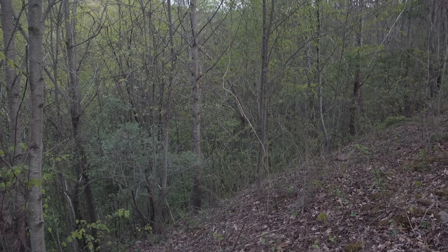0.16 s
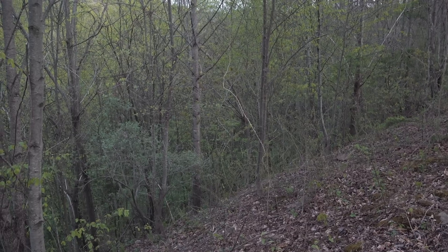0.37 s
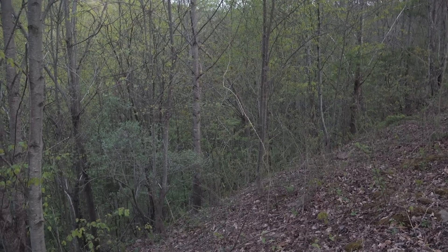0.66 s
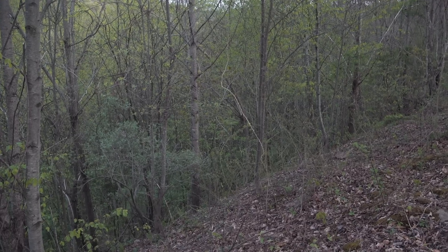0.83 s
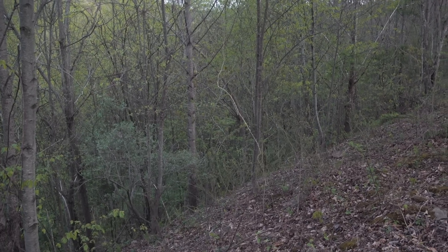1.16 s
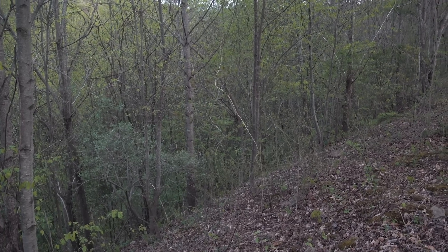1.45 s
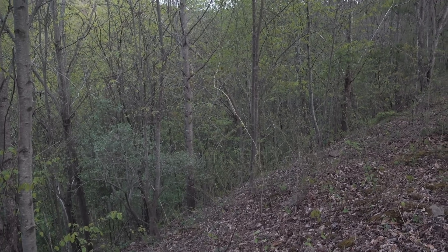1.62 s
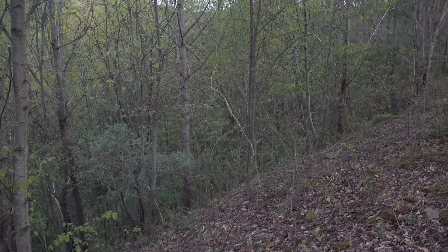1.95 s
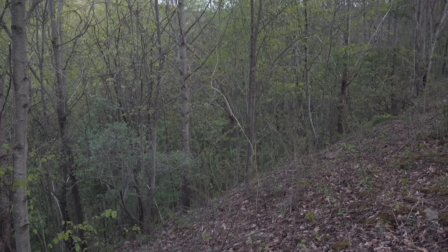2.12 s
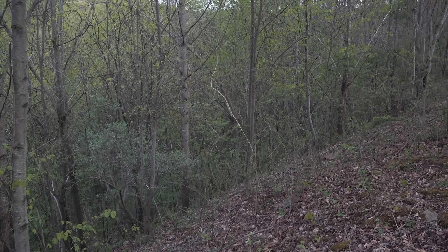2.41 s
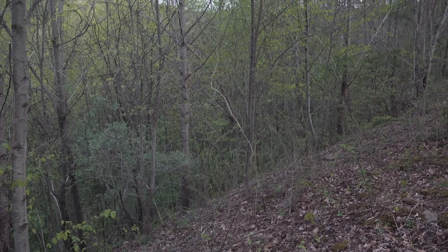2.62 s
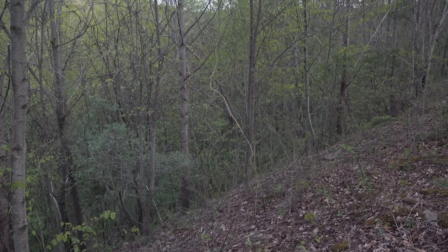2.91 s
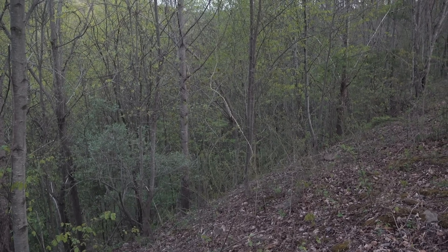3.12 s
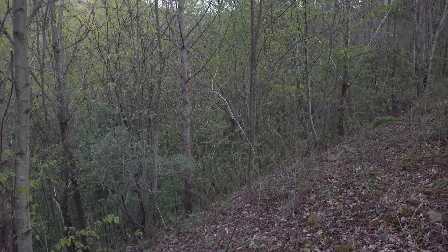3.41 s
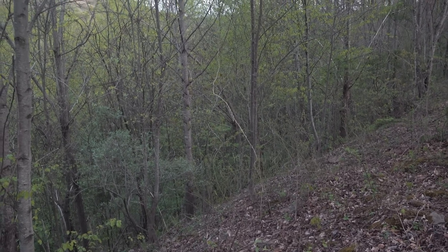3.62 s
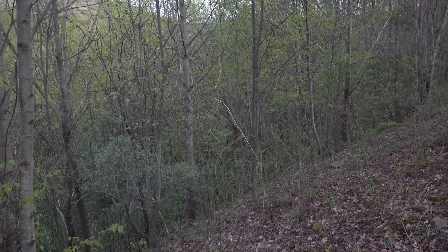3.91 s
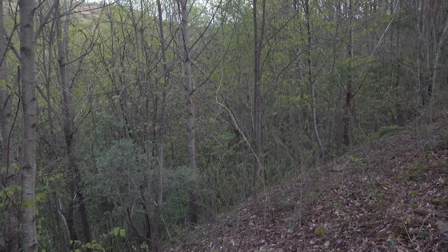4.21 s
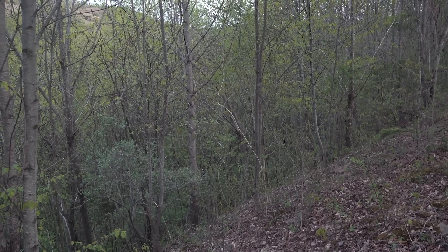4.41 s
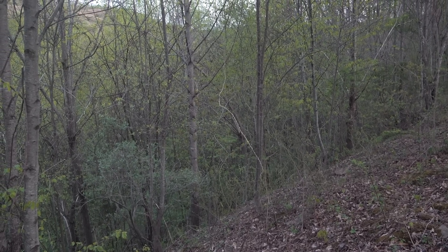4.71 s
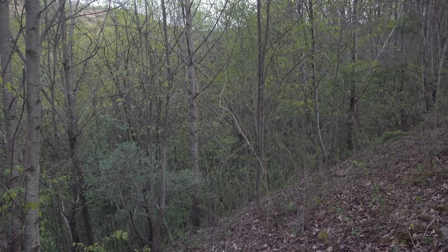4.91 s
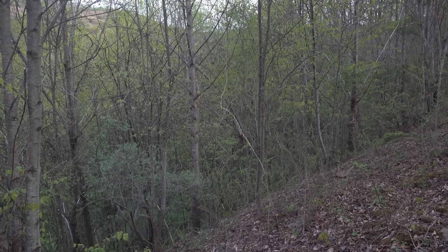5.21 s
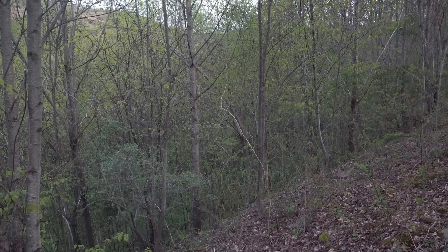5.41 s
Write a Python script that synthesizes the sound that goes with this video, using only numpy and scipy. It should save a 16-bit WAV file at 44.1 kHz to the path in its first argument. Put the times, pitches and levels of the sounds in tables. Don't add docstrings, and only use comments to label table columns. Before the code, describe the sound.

Three quick hoots and a longer falling hoot from a nearby owl, answered by a fainter rattling gobble, with faint birds and low wind bumps.

```python
import sys
import numpy as np
from scipy import signal
from scipy.fft import rfft, irfft
from scipy.io import wavfile
from scipy.ndimage import uniform_filter1d

SR = 44100
rng = np.random.default_rng(int(sys.argv[2]) if len(sys.argv) > 2 else 0)


def output_pcm(signal):
    pcm = np.clip(np.atleast_2d(signal).T, -1, 1) * 32767
    wavfile.write(sys.argv[1], SR, np.round(pcm).astype(np.int16))


def nominal_scale(level):
    x = np.asarray(level, float) / 20
    return 10 ** x


N = 245195
T = np.arange(N) / SR


def evened(x):
    return x / np.sqrt(np.mean(x ** 2) + 1e-20)


def peaked(x):
    return x / abs(x).max()


def read(points, hz):
    f, value = np.transpose(points)
    return np.interp(np.log(hz + 1), np.log(f + 1), value)


def add(mix, start_s, sound):
    part = mix[round(start_s * SR):][:len(sound)]
    part += sound[:len(part)]


def resonate(x, hz, width_hz):
    turn = np.exp(2j * np.pi * np.cumsum(hz * np.ones(len(x))) / SR)
    r = np.exp(-np.pi * width_hz / SR)
    return 2 * (turn * signal.lfilter([1 - r], [1, -r], x / turn)).real


def drift(count, span):
    return evened(uniform_filter1d(uniform_filter1d(rng.standard_normal(count), span), span))


def background(gain):
    # hz, level_db (per Hz)
    air_spectrum = [(15, -30.5), (25, -19), (179, 0), (216, -8.5), (360, -4.5), (510, -6.5), (650, -5),
                    (705, -8.5), (923, -11), (1240, -14.5), (1810, -18.5), (3450, -24), (4060, -26),
                    (15600, -35.5)]
    # centre_s, half_length_s, level_db
    gust_times = [(0.603, 0.022, -32.5), (2.03, 0.042, -36.5), (2.148, .05, -33), (2.539, 0.051, -41),
                  (3.045, 0.14, -45), (3.357, 0.034, -38), (3.47, 0.036, -38), (3.603, 0.032, -36),
                  (3.842, 0.057, -37), (4.53, 0.011, -36.5), (4.953, .05, -32.5), (5.47, .04, -59)]
    frames, hz = N // 256 + 5, np.fft.rfftfreq(1024, 1 / SR)
    a, b, patches = rng.standard_normal((frames, 513, 3)).T
    patches = evened(uniform_filter1d(uniform_filter1d(patches, 10, 0), 12, 1))
    depth_db = 2.2 / (1 + hz / 2500)[:, None]
    level_db = read(air_spectrum, hz)[:, None] + depth_db * patches
    hush = signal.istft((a + 1j * b) * nominal_scale(level_db), nperseg=1024, noverlap=768)[1]
    whine = nominal_scale(-83.5) * np.sin(2 * np.pi * 14320 * T)
    wind = evened(resonate(resonate(rng.standard_normal(N), 98.7, 30), 88, 40))
    gusts = nominal_scale(-61)
    for centre_s, half_s, db in gust_times:
        gusts = gusts + nominal_scale(db) * np.exp(-((T - centre_s) / half_s) ** 2)
    drone_hz, drone_width_hz = 79.6, 3.9
    drone = resonate(rng.standard_normal(N), drone_hz, drone_width_hz)
    drone = nominal_scale(-66.5) * evened(resonate(drone, drone_hz, drone_width_hz))
    return (nominal_scale(-46) * evened(hush[:N]) + whine) * gain + nominal_scale(-10.5) * gusts * wind + drone


def earlier_echo():
    return nominal_scale(-42.5 - 73.0 * T) * evened(resonate(resonate(rng.standard_normal(N), 500, 46), 700, 90))


def pipe(hz):
    # centre_hz, width_hz, level_db
    modes = [(623, 305, 9), (1935, 500, -34.5), (2382, 71, -39.5), (3110, 960, -43.5), (4860, 100, -46.5),
             (5600, 1000, -53.5), (7020, 800, -49.5), (8500, 350, -69.5)]
    return sum(nominal_scale(db) / (1 + 2j * (hz - f) / w) ** 3 for f, w, db in modes)


def arch(row, held):
    break_hz, jump_s = 441.9, .007
    creak_hz, sag_s = 110.6, 0.028
    attack_db, attack_s, fade_db, fade_bend = -30, .0038, -22, 2.2
    mode_hz, gap_depth_db = 677.6, -8.
    start, start_hz, bend, rise_db, _, end, fall_db = row
    s, db, hz = np.transpose(held)
    t = np.arange(start, end, 1 / SR)
    catch_s = s[0] - jump_s
    up = (t - start) / (catch_s - start)
    down = np.maximum(t - s[-1], 0)
    hz = np.interp(t, [catch_s, *s], [break_hz, *hz])
    hz = np.where(up < 1, start_hz + (break_hz - start_hz) * up ** bend, hz)
    hz = creak_hz + (hz - creak_hz) * np.exp(-down / sag_s)
    gap_db = gap_depth_db * np.sin(np.pi * mode_hz / hz) ** 2 * np.clip((hz - 150) / 100, 0, 1)
    rising, falling = t < s[0] - jump_s / 2, down > 0
    rise_db = rise_db + gap_db + attack_db * np.exp(-(t - start) / attack_s)
    fall_db = fall_db + gap_db + fade_db * (down / down[-1]) ** fade_bend
    db = np.select([rising, falling], [rise_db, fall_db], np.interp(t, s, db))
    db = uniform_filter1d(db, size=110) + .45 * drift(len(t), 500)
    return t, db, uniform_filter1d(hz, size=100), rising, falling


def slow_drifts(count, rows, span):
    return np.array([np.repeat(drift(count // 30 + 1, span), 30)[:count] for _ in range(rows)])


def overtones(t, hz, turns, high_db, octave_db):
    k, grid = np.arange(1, 65)[:, None], np.arange(12001.)
    overtone_hz = k * hz
    high = np.clip((overtone_hz - 1300) / 300, 0, 1)
    waver_db = 3.2 * slow_drifts(len(t), len(k), 70)
    waver_db += -8 * np.exp(-(t - t[0]) / .2) * (overtone_hz > 4200)
    waver_db += 3.3 * slow_drifts(len(t), len(k), 5) * np.clip(overtone_hz / 4500, 0, 1)
    partials = np.interp(overtone_hz, grid, pipe(grid), right=0) * nominal_scale(high * (high_db + waver_db))
    upper_hz = overtone_hz[2:]
    partials[2:] *= nominal_scale(-4. * np.exp(-((upper_hz - 1300) / 350) ** 2))
    ring_hz, ring_width_hz = 690, 110
    shut = np.clip((450 - hz) / 150, 0, 1) * (upper_hz < 1500)
    partials[2:] *= 1 - shut + shut / (1 + 2j * (upper_hz - ring_hz) / ring_width_hz)
    partials[1] *= nominal_scale(octave_db)
    partials[0] *= nominal_scale(-13. * np.clip((515 - hz) / 30, 0, 1) * np.clip(hz / 450, 0, 1))
    tone = (partials * np.exp(2j * np.pi * k * turns)).real.sum(0)
    return tone / np.sqrt((abs(partials) ** 2).sum(0) / 2)


def narrows_hiss(puffs, t, hz, rising, falling, hiss_db, top_db, lock_s):
    # centre_hz, width_hz, level_db
    narrows = [(1826, 83, 1.5), (2980, 730, 0), (4670, 180, -1), (5930, 1300, -11), (6900, 200, -12),
               (9100, 440, -12.5)]
    locked = np.clip((hz - 450) / 80, 0, 1)
    puff_db = 14 * np.exp(-(t - t[0]) / .022)
    top_hiss_db = (top_db - 4) * rising + puff_db - 11 * locked
    catch_db = 6 * np.exp(-((t - lock_s + .008) / .01) ** 2)
    out = np.zeros(len(t))
    for f, w, db in narrows:
        blotch_db = 3 * drift(len(t), 700) + top_hiss_db * (f > 4000 and w < 600)
        blotch_db += catch_db * (f < 4000) - 8 * falling * (f > 8000)
        out += nominal_scale(hiss_db + db - 6.5 + blotch_db) * evened(resonate(resonate(puffs, f, w), f, 2 * w))
    return out


def hoot(row, held):
    t, db, hz, rising, falling = arch(row, held)

    def by_phase(up, down, hold):
        return uniform_filter1d(np.select([rising, falling], [up, down], hold + 0 * t), size=800)

    high_db = by_phase(-6, -13, 4.5 + .07 * (hz - 575))
    octave_db = by_phase(-6.65, -6.65, -10.5 + 0.1742 * (hz.max() - hz) + 3.9 * drift(len(t), 900))
    air_db = by_phase(-14.5, -26, -34.5)
    hiss_db = by_phase(-38.5, -37.5 + 7.5 * np.clip((200 - hz) / 50, 0, 1), -43.5)
    slack = np.clip(300 / hz, 0, 1.9)
    turns = np.cumsum(hz * (1 + 0.014 * slack ** 2 * drift(len(t), 120))) / SR
    tone = overtones(t, hz, turns, high_db, octave_db)
    puffs = rng.standard_normal(len(t)) * (1 + .5 * np.cos(2 * np.pi * turns))
    f = np.fft.rfftfreq(len(t), 1 / SR)
    air = evened(irfft(rfft(puffs) * pipe(f) * (f / 600) ** 0.2, len(t)))
    tone += narrows_hiss(puffs, t, hz, rising, falling, hiss_db, row[4], held[0][0])
    return t[0], nominal_scale(db) * (tone + nominal_scale(air_db) * air) * signal.windows.tukey(len(t), 200 / len(t))


def owl():
    # start_s, start_pitch_hz, bend, effort_db, top_hiss_db
    rises = [
        (.098, 252.3, 2.12, -8, -1),
        (.514, 251, 1.54, -7.5, 2),
        (.922, 288.9, 1.8, -9.5, -11.5),
        (1.325, 334, 2.77, -12.5, -8),
    ]
    # time_s, level_db, pitch_hz
    held_notes = [
        [(.166, -8.7, 516), (.178, -9.9, 540), (.198, -6.6, 558), (.225, -8.6, 557), (.25, -14.8, 529),
         (.262, -21, 475)],
        [(.584, -6.1, 535), (.594, -7.2, 558), (.607, -5.5, 571), (.635, -9.4, 584), (.67, -10.6, 559),
         (.687, -22, 478)],
        [(.983, -6.8, 541), (1.003, -5.3, 579), (1.03, -7.2, 594), (1.06, -9.2, 577), (1.082, -9.6, 556),
         (1.096, -25, 465)],
        [(1.379, -10, 536), (1.402, -5.3, 577), (1.425, -7.6, 590), (1.485, -8.4, 579), (1.585, -4.9, 615),
         (1.685, -5.9, 625), (1.758, -7.6, 604), (1.788, -13.9, 570), (1.808, -16, 520)],
    ]
    # end_s, effort_db
    falls = [
        (.306, -17.5),
        (.738, -19.5),
        (1.159, -20),
        (1.977, -17),
    ]
    out = np.zeros(N)
    for rise, held, fall in zip(rises, held_notes, falls):
        add(out, *hoot(rise + fall, held))
    return out


def recorder_gain(near):
    recover_s, quick_s = 0.61, 0.076
    slow, quick = (np.exp(-1 / (s * SR)) for s in (recover_s, quick_s))
    sunk_db = -48.5 * signal.lfilter([1 - slow], [1, -slow], abs(near))
    sunk_db += -6.5 * signal.lfilter([1 - quick], [1, -quick], abs(near))
    left_low_db = -6 * np.exp(-T / recover_s)
    return nominal_scale(np.maximum(sunk_db + left_low_db, -9.5))


def twigs():
    # start_s, peak_db, pitch_hz
    ticks = [
        (0.1296, -49, 3135),
        (0.7395, -55, 2990),
        (4.2057, -35.5, 3190),
        (5.249, -44, 4940),
        (5.3862, -46, 4300),
    ]
    out, t = np.zeros(N), np.arange(400) / SR
    for start_s, db, hz in ticks:
        snap = rng.standard_normal(400) * nominal_scale(-60 * t / 0.01) * np.clip(t / .0004, 0, 1)
        add(out, start_s, nominal_scale(db) * peaked(resonate(resonate(snap, hz, 550), hz, 650)))
    return out


def note(length_s, start_hz, end_hz, db, bend):
    u = np.linspace(0, 1, round(length_s * SR))
    hz = start_hz + (end_hz - start_hz) * u ** bend
    hz *= 1 + .008 * drift(len(u), 90)
    flutter = nominal_scale(2.2 * drift(len(u), 400))
    tone = np.sqrt(2) * np.sin(2 * np.pi * np.cumsum(hz) / SR)
    return nominal_scale(db) * tone * signal.windows.tukey(len(u), .4) * flutter


def thin_whistle():
    # start_s, length_s, pitch_hz, level_db
    whistle_notes = [(1.12, .155, 4040, -69), (1.297, .065, 4040, -68), (1.39, .22, 4035, -67),
                     (1.76, .14, 4045, -66), (1.92, .17, 4020, -64), (2.108, .12, 4020, -59),
                     (2.25, .195, 4020, -63), (2.445, .125, 4010, -66), (2.59, .07, 4030, -71)]
    out = np.zeros(N)
    for start_s, length_s, hz, db in whistle_notes:
        t = np.arange(0, length_s, 1 / SR)
        tone = np.sqrt(2) * np.sin(2 * np.pi * hz * t)
        add(out, start_s, nominal_scale(db) * tone * signal.windows.tukey(len(t), .025 / length_s))
    return out * nominal_scale(2.2 * drift(N, 600))


def chatter():
    blur = resonate(resonate(rng.standard_normal(N), 3410, 300), 2970, 400)
    burst_db = 9 * np.exp(-((T - 3.07) / .25) ** 2)
    swell = np.clip((T - 2.03) / 0.22, 0, 1) * nominal_scale(-57.5 + burst_db)
    return swell * evened(blur) * nominal_scale(4.7 * drift(N, 700) - 13.0)


def birds():
    # start_s, length_s, start_hz, end_hz, level_db
    slurs = [(2.5, .24, 2500, 1950, -62), (2.52, .05, 4050, 3450, -63), (2.715, .04, 4400, 3400, -63),
             (2.82, .03, 4400, 3700, -63), (3.31, .12, 2420, 2130, -59), (3.63, .05, 5300, 5300, -66),
             (4.035, .105, 3740, 3740, -62.5), (4.08, .05, 1180, 1230, -53), (4.39, .07, 1320, 1080, -48.5),
             (4.39, .05, 1950, 1650, -58), (4.71, .07, 3480, 3500, -63), (4.84, .09, 3500, 3500, -69),
             (5.25, .05, 5100, 4300, -68), (5.38, .04, 3700, 5000, -68), (5.425, .025, 3400, 3350, -57.5)]
    out = thin_whistle()
    for start_s, *shape in slurs:
        add(out, start_s, note(*shape, bend=.75))
    for k in range(7):
        chip_db = -68 - 5 * (k == 0)
        add(out, 2.567 + k * .1215, note(.08, 5250, 3400, chip_db, bend=1.3))
    return out + chatter()


def turkey():
    # start_s, peak_db, length_s, throat_hz, chest_db
    syllables = [(2.747, -27, 0.048, 1204, -5), (2.819, -26, 0.025, 1297, -8.5),
                 (2.837, -22, 0.029, 1051, -9), (2.909, -29.5, 0.016, 1265, 4.5),
                 (2.965, -22, .013, 1007, -5.5), (3.012, -17.5, 0.007, 1034, -8.5),
                 (3.027, -22, 0.013, 1089, -14), (3.047, -18.5, 0.0074, 1022, -8),
                 (3.061, -18.5, .022, 1082, -27), (3.128, -25, 0.014, 962, 1.5),
                 (3.182, -19.5, 0.0042, 1000, -35), (3.216, -21, 0.035, 940.6, -9),
                 (3.243, -30, 0.014, 931, 1.5), (3.304, -28.5, 0.018, 943, -19),
                 (3.354, -23.5, 0.0049, 925, -6.5), (3.405, -23.5, 0.021, 877, -1),
                 (3.478, -23.5, 0.0153, 896, -3.5), (3.526, -23, 0.011, 900, -35),
                 (3.57, -26.5, 0.046, 958, -23), (3.655, -24, 0.016, 866, -4), (3.696, -23, 0.01, 900, -10),
                 (3.751, -22, .037, 872.5, -17.5), (3.832, -24.5, 0.013, 847, -11),
                 (3.847, -24.5, 0.027, 928, -38)]
    # time_s, resonance_hz, level_db
    beak_path = [(2.75, 1616, -6), (2.82, 1730, -8), (2.839, 1360, -7.5), (2.91, 1420, -22),
                 (3.06, 1320, -25), (3.13, 1850, -18), (3.239, 1650, -11), (3.4, 1510, -12),
                 (3.849, 1485, -17.5)]
    out = np.zeros(N)
    when, *beak_shape = np.transpose(beak_path)
    for start_s, db, length_s, throat_hz, chest_db in syllables:
        beak_hz, beak_db = (np.interp(start_s, when, c) for c in beak_shape)
        t = np.arange(0, length_s + .025, 1 / SR)
        multiple = round(throat_hz / 315)
        hz = throat_hz / multiple * (1 - 1.61 * t) * (1 + 0.089 * drift(len(t), 60))
        turns = np.cumsum(hz) / SR - .45
        pulses = evened(sum(np.cos(2 * np.pi * k * turns) for k in range(1, 9)))
        drive = pulses + .28 * rng.standard_normal(len(t)) * (1 + np.cos(2 * np.pi * turns))
        drive *= np.clip(t / .0015, 0, 1) * np.clip((length_s - t) / .005 + 1, 0, 1)
        drive *= nominal_scale(2.2 * drift(len(t), 130))
        throat = resonate(resonate(drive, throat_hz, 233), throat_hz, 233)
        chest = resonate(resonate(drive, 660 - 4000 * t, 213), 544, 220)
        late_chest = np.pad(chest, (220, 0))[:len(t)]
        beak = resonate(resonate(drive, beak_hz, 219), beak_hz, 184)
        beak += nominal_scale(-8.5) * resonate(resonate(drive, 1870, 180), 2150, 340)
        syllable = peaked(throat) + nominal_scale(chest_db) * peaked(late_chest) - nominal_scale(beak_db) * peaked(beak)
        add(out, start_s - .004, nominal_scale(db - 6.0) * syllable)
    return out


def woods(x):
    # hz, t60_s
    decay = [(300, 0.31), (600, 3.15), (1000, 2.4), (2000, 2.8), (5000, 1.88)]
    taps = np.zeros(2 * SR)
    at = np.arange(900, 2 * SR - 20, 20)
    taps[at + rng.integers(0, 20, len(at))] = rng.choice([-1., 1.], len(at))
    hz, t, z = signal.stft(taps, SR, nperseg=256)
    tail = signal.istft(z * nominal_scale(-60 * t / read(decay, hz)[:, None]), SR, nperseg=256)[1]
    return signal.fftconvolve(x, tail / np.linalg.norm(tail))[:N]


def scene():
    near, far, song = owl(), turkey(), birds()
    echoes = woods(nominal_scale(-29.5) * near + nominal_scale(-6.5) * far + nominal_scale(-2.5) * song)
    mix = near + far + song + echoes + earlier_echo() + twigs() + background(recorder_gain(near))
    return mix[None]


def band_limit(x):
    return signal.sosfilt(signal.butter(12, 15760, fs=SR, output="sos"), x)


def record(dry):
    return band_limit(dry)


dry = scene()
out = record(dry)
output_pcm(out)
```